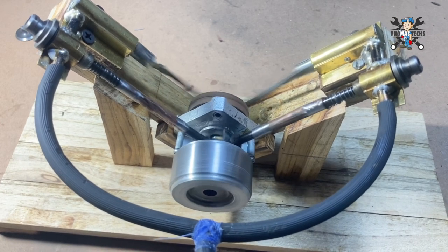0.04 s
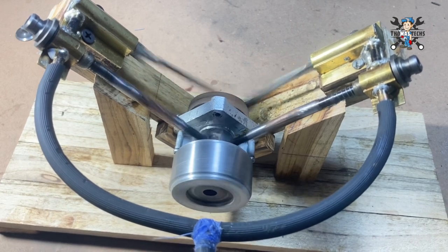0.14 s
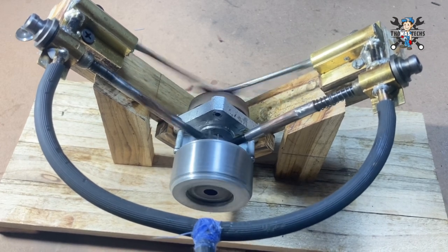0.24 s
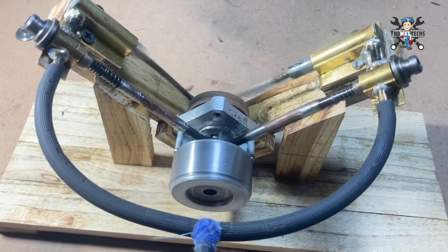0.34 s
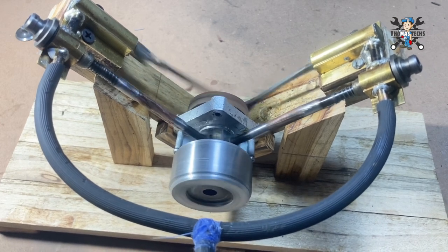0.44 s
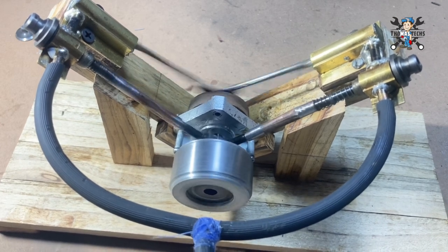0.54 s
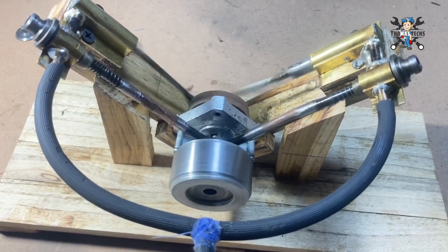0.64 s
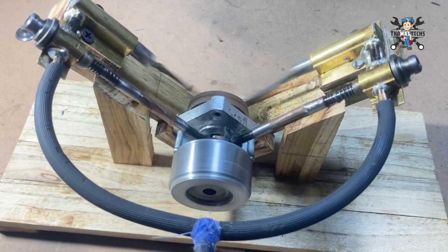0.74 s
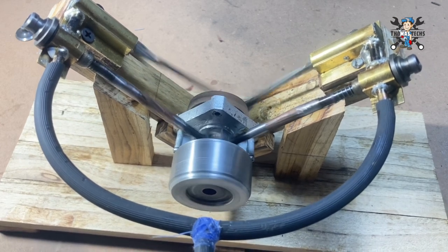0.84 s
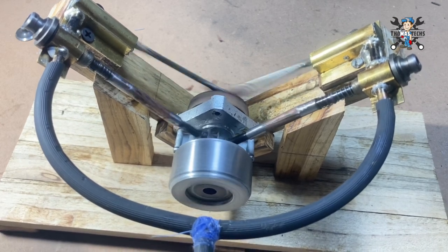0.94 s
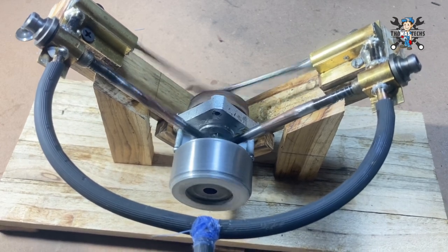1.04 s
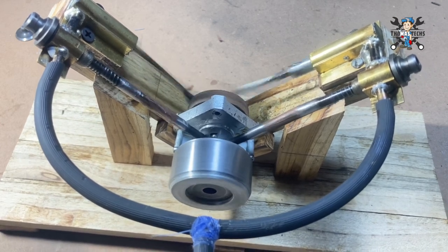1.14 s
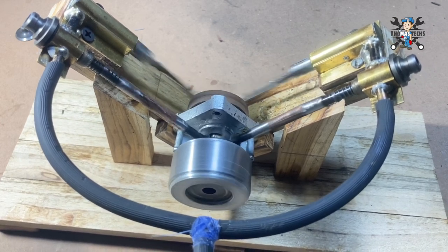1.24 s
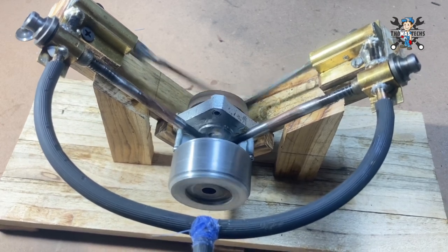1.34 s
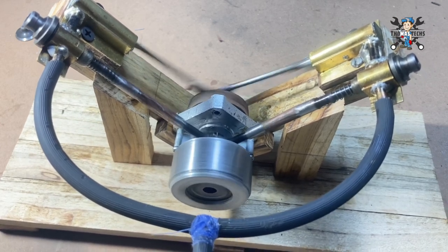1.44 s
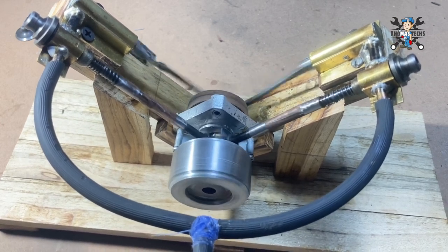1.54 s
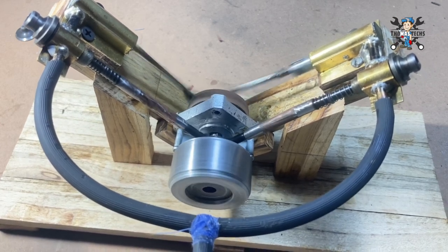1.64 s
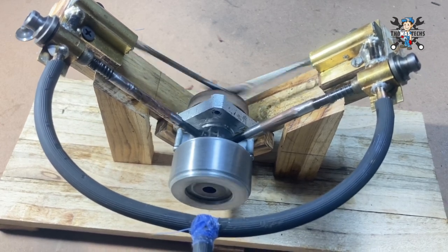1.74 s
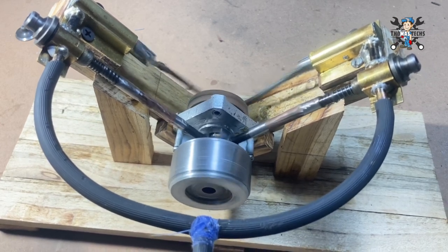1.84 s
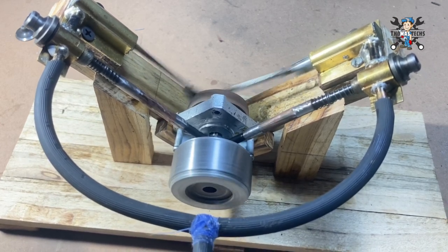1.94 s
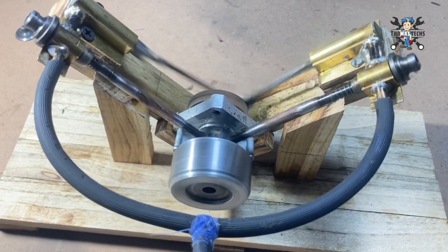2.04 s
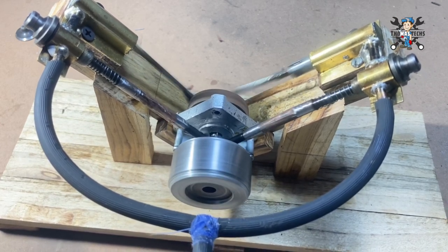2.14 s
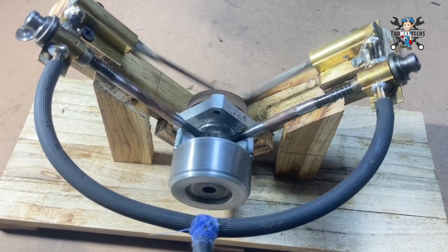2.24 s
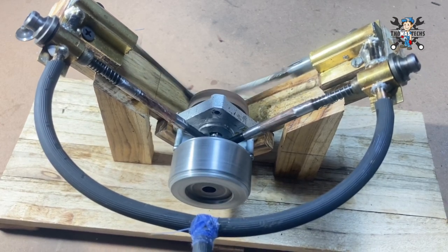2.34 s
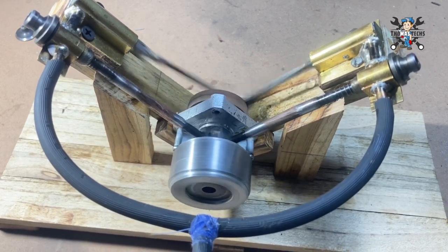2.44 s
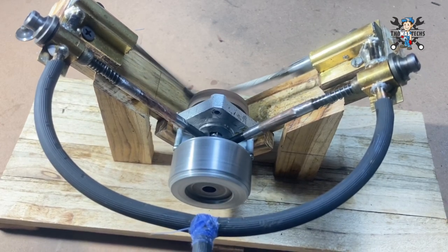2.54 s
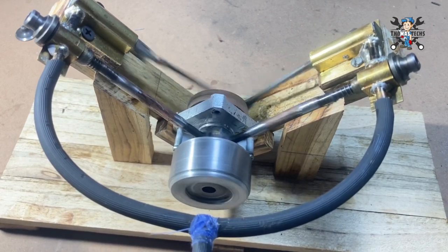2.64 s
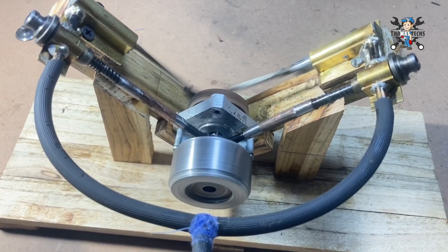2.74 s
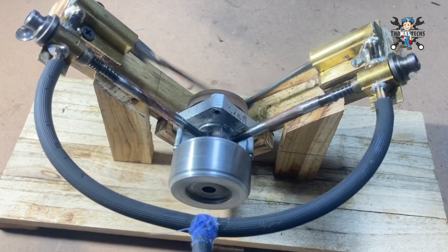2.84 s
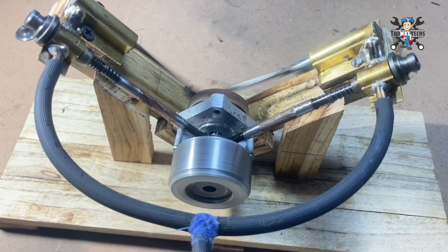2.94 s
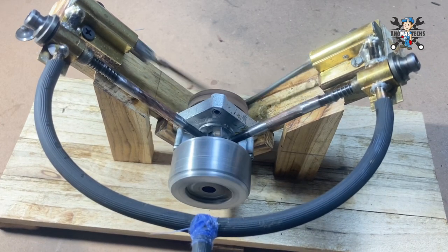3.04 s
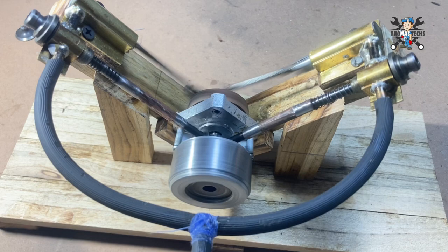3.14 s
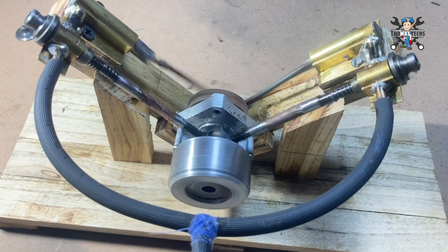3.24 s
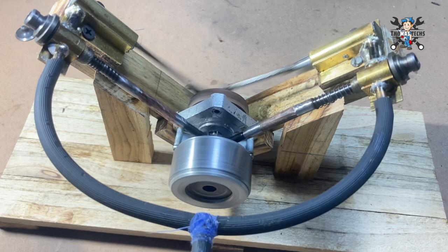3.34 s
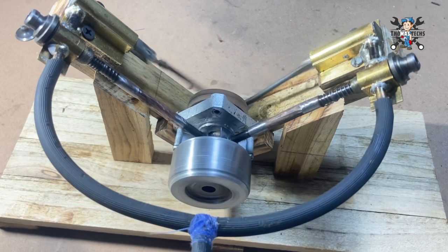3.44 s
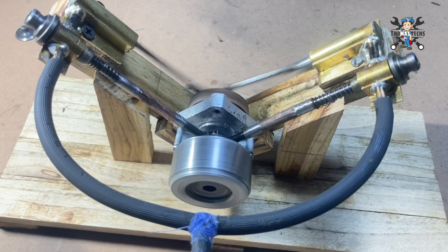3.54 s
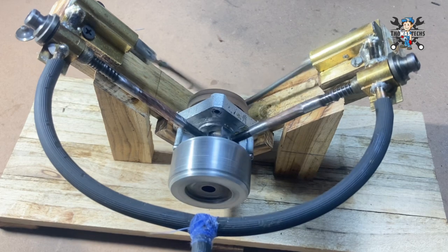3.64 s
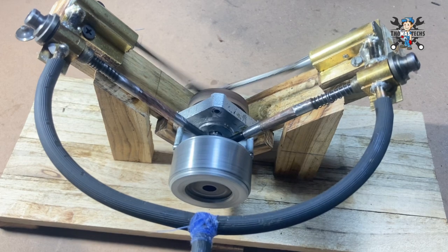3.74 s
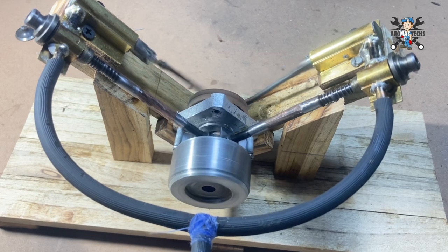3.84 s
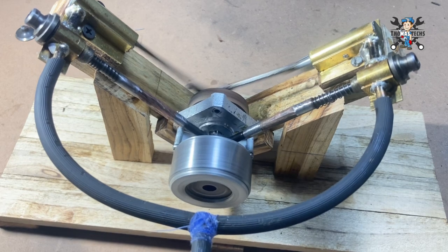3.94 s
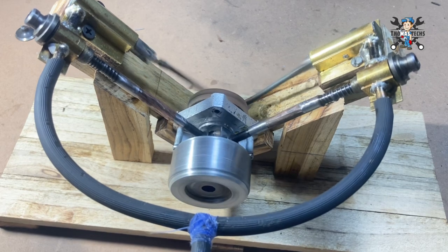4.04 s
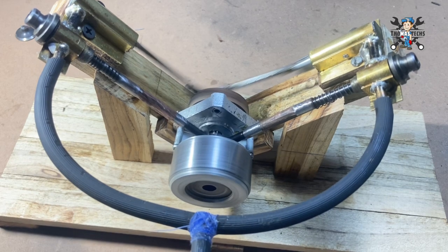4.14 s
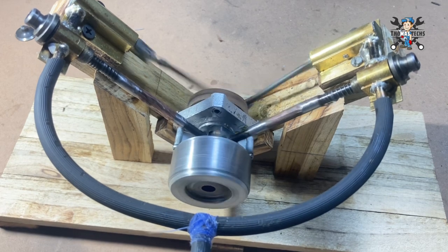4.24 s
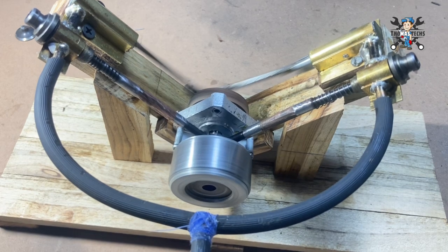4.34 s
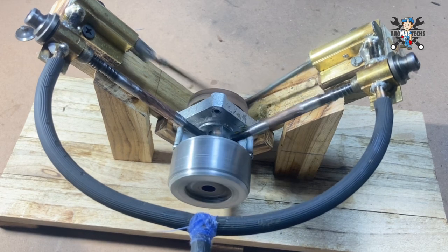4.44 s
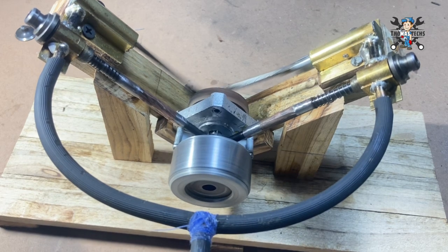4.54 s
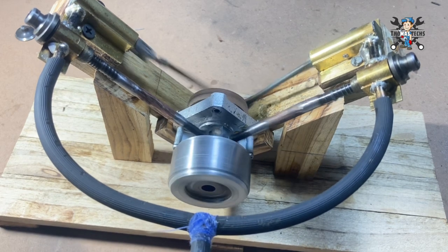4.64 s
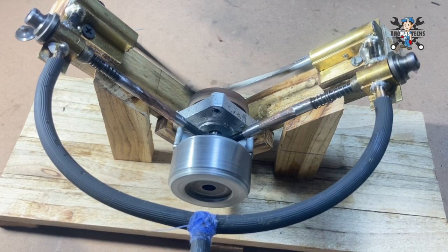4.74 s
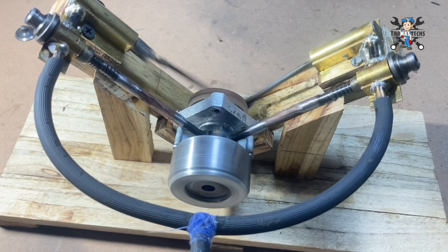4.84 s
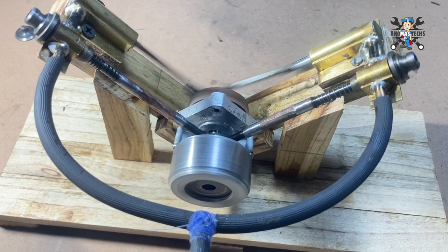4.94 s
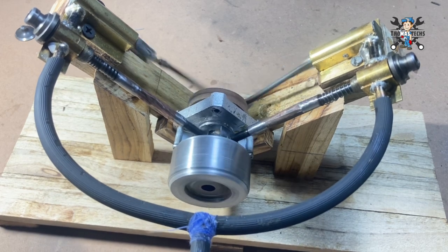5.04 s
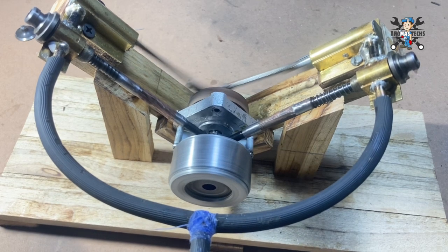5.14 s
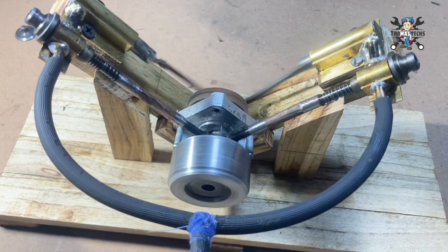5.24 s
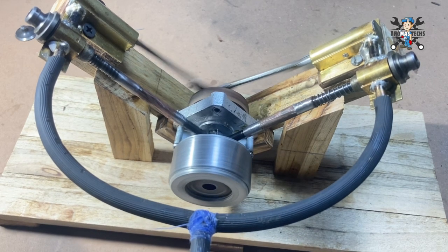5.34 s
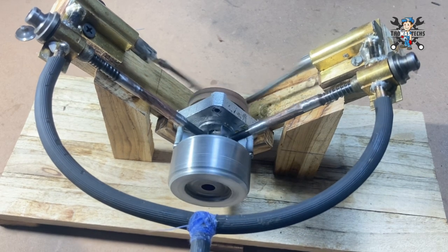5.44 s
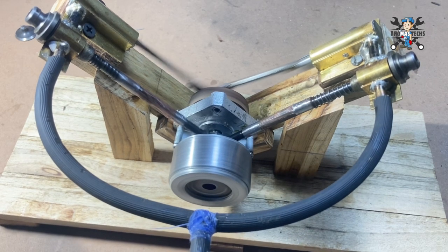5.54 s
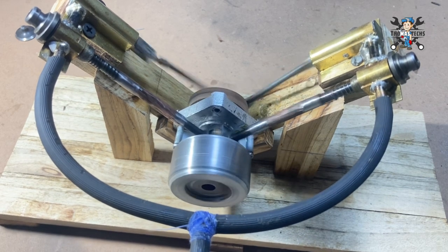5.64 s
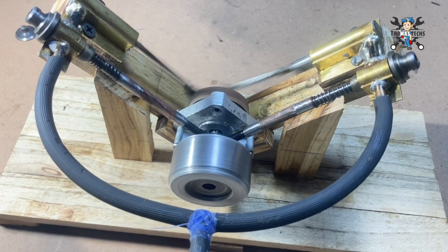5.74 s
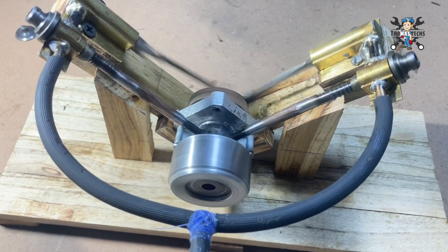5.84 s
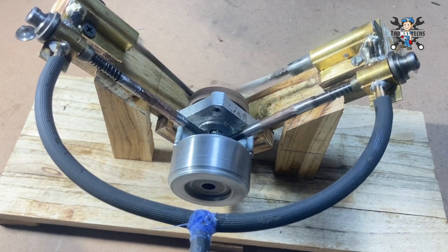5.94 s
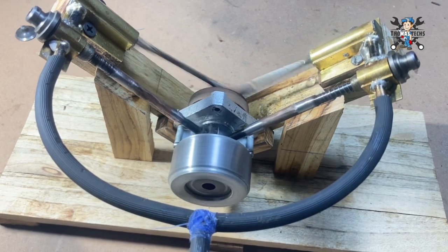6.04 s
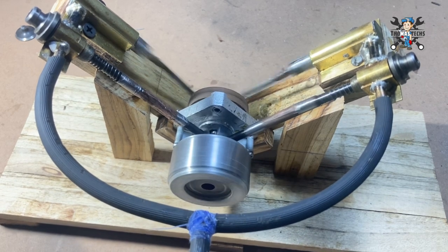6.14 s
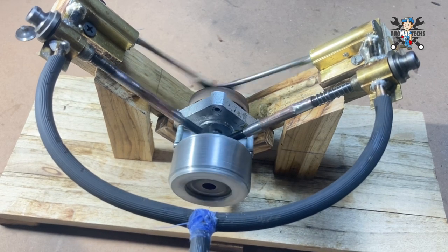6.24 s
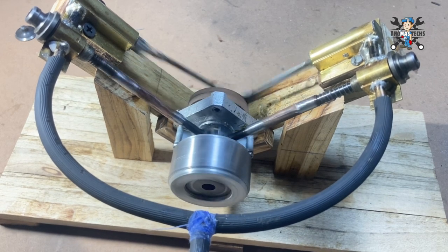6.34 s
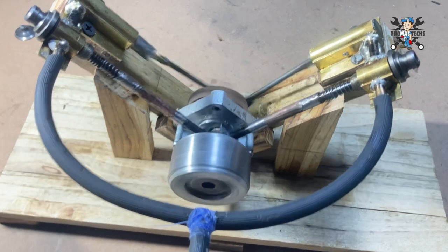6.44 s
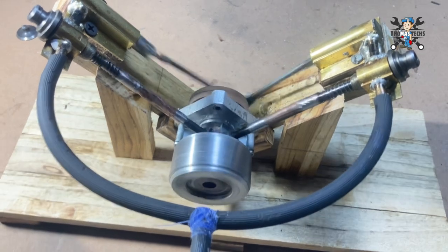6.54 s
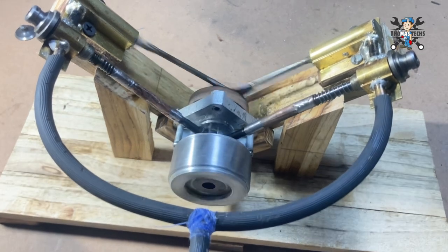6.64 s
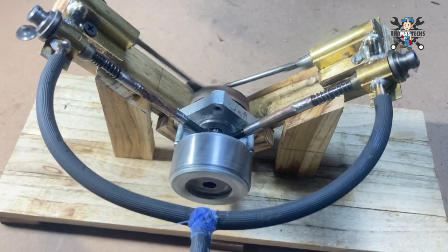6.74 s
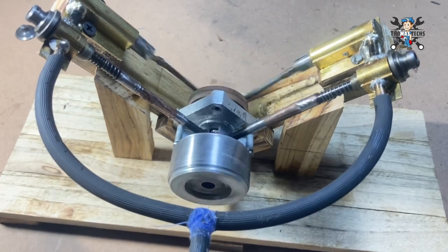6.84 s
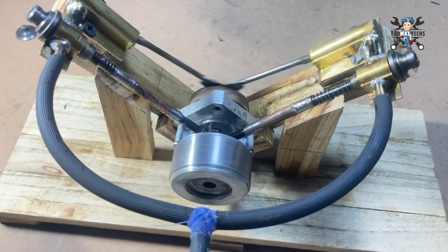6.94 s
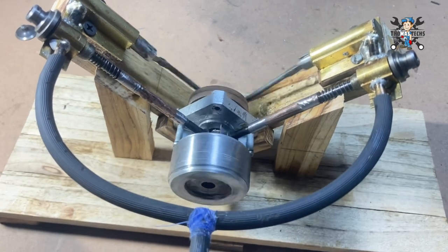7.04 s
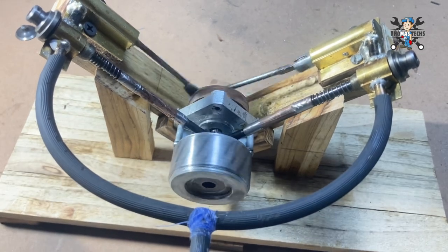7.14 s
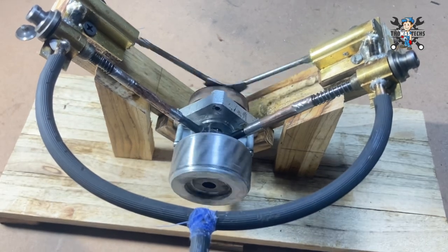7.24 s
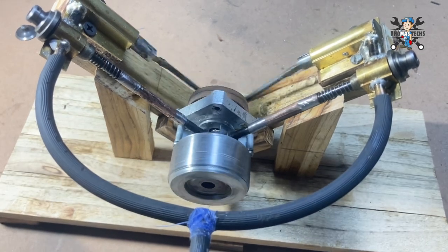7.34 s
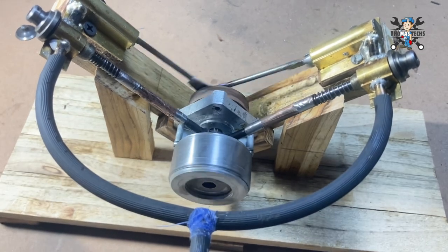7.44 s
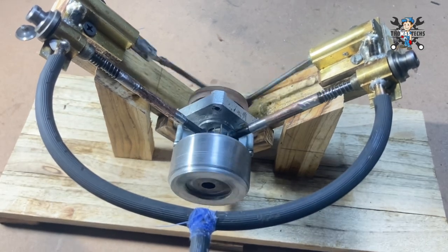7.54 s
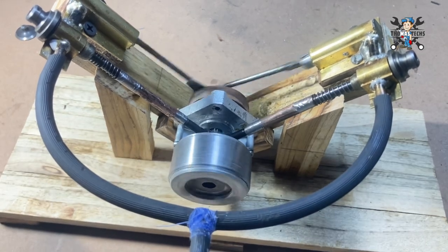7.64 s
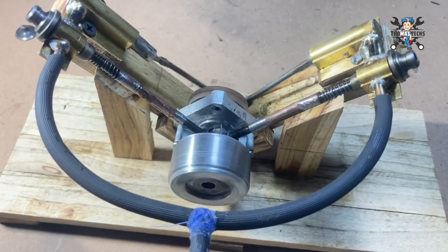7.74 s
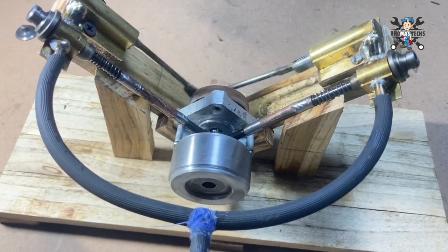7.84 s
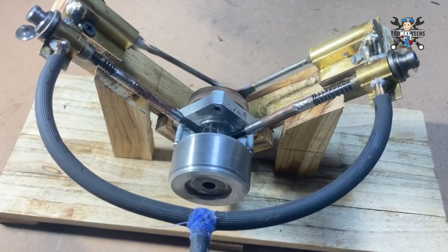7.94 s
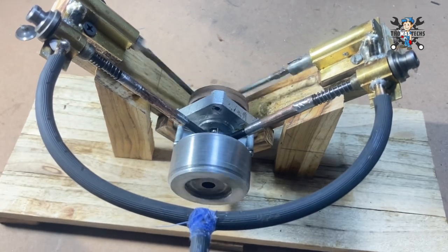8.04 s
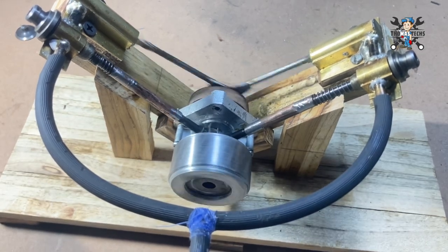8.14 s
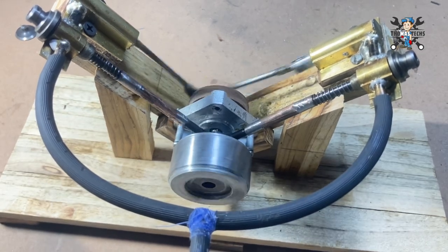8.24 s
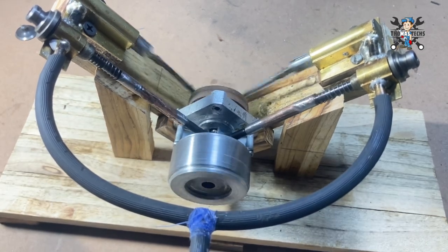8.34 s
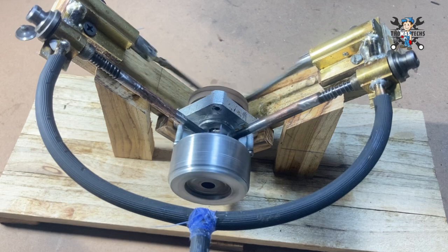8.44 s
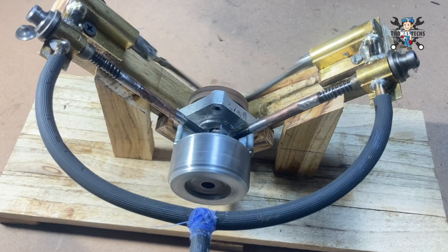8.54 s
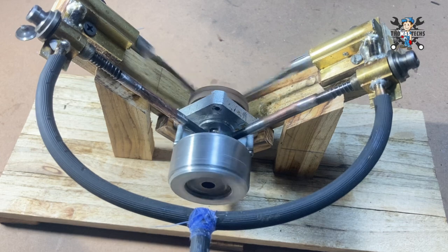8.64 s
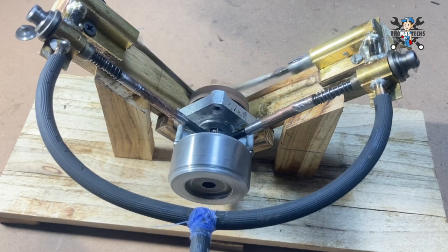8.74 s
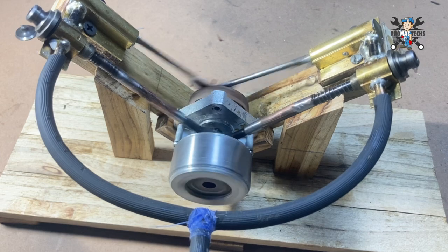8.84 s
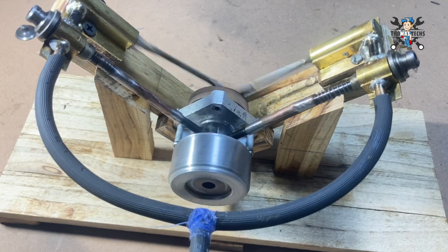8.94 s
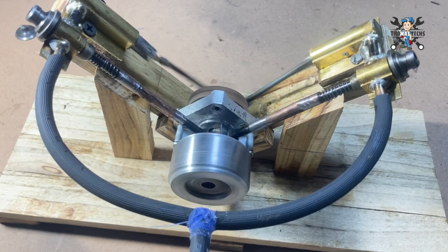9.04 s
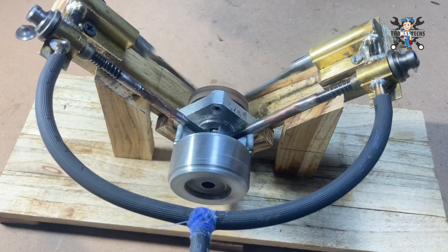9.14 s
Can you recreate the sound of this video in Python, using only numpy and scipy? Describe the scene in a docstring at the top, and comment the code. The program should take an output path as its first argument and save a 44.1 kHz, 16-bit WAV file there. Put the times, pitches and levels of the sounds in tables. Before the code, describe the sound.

A small two-cylinder engine runs on compressed air, heard close in stereo in a small room. From the start it races, spitting short, sharp puffs over a pulsing high hiss. Loose rods clink and rattle with woody knocks from the board beneath, along with faint piston scraping and a low shaking rumble. The strongest spits and knocks come around 1 to 1.5 seconds. The pace then dips briefly and settles into a steady, rapid clatter from about 2 to 6 seconds. Just after 6 seconds the engine slows and the hiss fades, until it almost stalls near 7.3 seconds. Until about 8 seconds it labours with separate, uneven chuffs, scattered knocks and a thin whistling hiss, clearest at 7.3 seconds. It then gathers speed with louder knocks and returning hiss, running quickly again from 8.6 seconds to the end at about 9 seconds.

```python
"""A small twin-cylinder engine on a wooden board runs fast on an air hose, slows almost to a halt
and picks up again. Its valves spit short puffs over a leak that breathes with the crank; at low speed
they chuff, with a thin whistle. Loose rods knock and rattle, ringing themselves and the board, the
pistons scrape and the unbalanced flywheel shakes the board. Close stereo from above, in a small room."""
import sys
import numpy as np
from scipy import signal
from scipy.io import wavfile
from scipy.ndimage import uniform_filter1d

SR = 44100
rng = np.random.default_rng(int(sys.argv[2]) if len(sys.argv) > 2 else 0)


def wrap_up_sound(samples):
    """Save the sound to the file named by the first command line argument, as 16-bit audio."""
    columns = np.atleast_2d(samples).T
    # keep every value between -1 and 1, then stretch to whole-number steps
    tamed = np.clip(columns, -1, 1)
    steps = np.round(tamed * 32767).astype(np.int16)
    wavfile.write(sys.argv[1], SR, steps)


N = 404824
T = np.arange(N) / SR

# faders of the continuous layers: (time [s], leak [dB], rattle [dB], shaking [dB])
FADERS = [(0.0, -28.5, -29.5, -37.5), (0.51, -28.5, -31.5, -41.5), (1.05, -28, -30, -36.5),
          (1.61, -32, -32.5, -42.5), (2.43, -30, -32, -40), (6.14, -30.5, -31.5, -40.5),
          (6.57, -42, -36, -44.5), (7.18, -53, -50.5, -47.5), (7.31, -24.5, -48.5, -43.5),
          (7.39, -43, -41, -43.5), (7.54, -33.5, -42, -42.5), (7.82, -51.5, -44.5, -45.5),
          (7.98, -28, -51, -43), (8.05, -42, -37.5, -46), (8.18, -26, -46, -43), (8.21, -37, -38.5, -44.5),
          (8.61, -28.5, -31, -40), (9.13, -33.5, -31.5, -39), (9.18, -34, -34.5, -47)]
# resonances of the board: (frequency [Hz], level [dB], t60 [s], left minus right [dB])
BOARD_MODES = [(284, -16.5, 0.037, 1), (476.6, -22.5, 0.051, 6.5), (722, -16.5, 0.022, -4),
               (1067.7, -0.5, 0.039, 5.5), (1183, -0.5, 0.03, 3), (1290.5, -3, 0.028, 9),
               (1412, -8, 0.035, -4.5), (1569.5, -4.5, 0.017, 7)]
# resonances of the rods: (frequency [Hz], level [dB], t60 [s], left minus right [dB])
ROD_MODES = [(1943, -18.5, 0.046, 1.4), (2426, -4.5, 0.018, 3.7), (2608, -8, 0.041, 4.3),
             (2737, 1.5, 0.019, 3.1), (2906, -7, 0.016, 6.7), (3350, -7, 0.015, 6.3),
             (3746, -8, 0.037, 4.6), (4110, -16, 0.028, 2), (4960, -16, 0.025, 1)]


def valve_air(opening):
    """Air bursts out as a valve opens, over a pulsing leak; slow turns under pressure give long chuffs."""
    # tone of the hiss, with a deep narrow gap near 12.9 kHz: (frequency [Hz], density [dB])
    hiss_spectrum = [(1500, -26.5), (3000, -16), (4300, -9.5), (5500, -8), (6600, -5), (8000, -1),
                     (9200, -2.5), (10300, -4), (11200, -6.5), (12200, -9.5), (12900, -72), (13800, -12.5),
                     (14800, -21.5), (15600, -10)]
    # stereo focus of the jet: (frequency [Hz], left-right likeness [0-1])
    jet_likeness = [(3000, 0.044), (5500, 0.11), (6500, 1), (15000, 1)]
    in_step_hz, cycle_hz = 6784, 4580  # the jet reaches the right side first: a cycle more per cycle_hz
    jet = stereo_noise(hiss_spectrum, jet_likeness, lambda hz: 2 * np.pi * (hz - in_step_hz) / cycle_hz,
                       patchy_db=3.0, size=256)
    slow = np.clip((13.0 - crank_speed()) / 12.6, 0, 1)
    held = slow * np.clip(opening / 0.29, 0, 1)  # weak openings stay short
    t = np.arange(3000) / SR
    spit = (1 - np.exp(-t / 0.0012)) * (np.exp(-t / 0.0011) + 0.18 * np.exp(-t / 0.0069))
    chuff = (1 - np.exp(-t / 0.0021)) ** 2 * (2.0 * np.exp(-t / 0.0059) + 0.36 * np.exp(-t / 0.012))
    puffs = signal.oaconvolve(opening * (1 - held), spit)[:N]
    puffs += signal.oaconvolve(opening * held, chuff)[:N]
    puffs += 33.0 * uniform_filter1d(uniform_filter1d(opening, 121), 121)  # air creeps past just before
    turbulence = unit_rms(uniform_filter1d(rng.standard_normal(N), size=90))
    leak = gain_of(curve(FADERS, 1) + (1 + 0.43 * slow) * turn_db(1) - 1.5)  # pulses deeper when slow
    return jet * np.hypot(gain_of(-3.5) * puffs, leak) * gain_of(2.1 * np.clip(turbulence, -2, 2))


def valve_openings():
    """One spike for each valve opening: the rhythm of the crank plus single accents."""
    # puffs of every turn: (moment, pressure share, spread [dB], crawling [dB], cruising [dB], racing [dB])
    puffs = [("second valve", 1, 0.61, -6.5, -10.5, -11.5), ("first valve", 0.41, 1.9, -11, -19.5, -38),
             ("lead", 1, 3.2, -45, -36, -11), ("between", 1, 3, -15.5, -40, -25),
             ("after", .95, 2.5, -12, -32, -21), ("late", .9, 4.1, -44, -22.5, -36)]
    # loudest puffs at full speed: (time [s], level [dB])
    accents = [(0.2314, -10), (0.2897, -18), (0.764, -12), (0.8764, -10), (1.0064, -4), (1.1159, -11),
               (1.1488, -7), (1.3733, -12), (1.3997, -19), (1.4343, -5.5), (1.498, -8), (1.6821, -10),
               (1.9736, -15), (2.1802, -8.5), (2.3785, -19), (3.04, -24), (3.4363, -14), (4.0183, -12),
               (5.236, -16), (6.053, -16)]
    return crank_spikes(puffs) + spikes(accents)


def valve_pings(opening):
    """The spool and its spring ring briefly as a valve snaps open; a ragged snap colours each ping."""
    # resonances of the spool: (frequency [Hz], level [dB], t60 [s], left minus right [dB])
    spool_modes = [(5076, -9.5, 0.029, -1), (5215, -6.5, 0.045, 6), (6860, 10, 0.0078, -4.5),
                   (11060, 7, 0.013, 2)]
    snap = signal.oaconvolve(opening, np.exp(-np.arange(150) / 34.0))[:N] * rng.standard_normal(N)
    return gain_of(-23.5) * ring(snap, spool_modes, lag_rad=0.22)


def rod_knocks():
    """Rod ends hit across their slack and ring board and rods; each loud knock is a scuffle of contacts."""
    # loudest knocks: (time [s], level [dB])
    accents = [(0.4219, -13), (0.7188, -12), (0.7657, -17), (0.822, -22), (0.9323, -21), (0.9522, -10),
               (0.9867, -11.5), (1.062, -10.5), (1.1169, -9), (1.2281, -14.5), (1.262, -13), (1.4012, -16),
               (1.499, -17), (1.8357, -17.5), (2.3166, -28), (2.7117, -14.5), (5.0843, -20),
               (7.0544, -24.5), (7.3048, -24), (7.4709, -26), (7.5323, -22), (7.6725, -17.5),
               (7.9029, -20.5), (7.9723, -23), (8.1234, -17), (8.1733, -16), (8.2786, -14), (8.315, -18),
               (8.4008, -13), (8.4302, -13.5), (8.5061, -10.5), (8.5999, -13.5), (8.7934, -13.5),
               (8.8528, -11), (8.8757, -15), (8.9351, -10)]
    # board hits per turn: (moment, pressure share, spread [dB], crawling [dB], cruising [dB], racing [dB])
    clacks = [("first knock", 0.18, 2.9, -25.5, -20.5, -23),
              ("second knock", 0.57, 3.4, -24.5, -19.5, -21.5), ("reversal", 0.46, 4.5, -34, -22.5, -21.5),
              ("second valve", 1, 9, -33, -30.5, -21), ("half", 0.26, 1.6, -23.5, -31.5, -32),
              ("return", .4, 3.1, -38, -25.5, -23)]
    # rod hits per turn: columns as in clacks
    clinks = [("reversal", 0.21, 3.3, -23, -20.5, -15.5), ("take-up", .4, 5.4, -40, -24, -27),
              ("second valve", 0.89, 8.4, -33, -34.5, -25.5), ("return", 0.28, 5.7, -32, -29, -29)]
    # loudest clinks: (time [s], level [dB])
    loud_clinks = [(0.177, -16), (0.2399, -15), (0.2997, -16), (0.3601, -16), (0.4209, -12), (1.3219, -18),
                   (1.3818, -21), (2.4404, -25), (5.2784, -16), (5.8227, -19), (6.099, -20), (6.1679, -20),
                   (6.2412, -15), (6.3195, -17), (6.4068, -28), (6.4687, -24), (6.6513, -36), (6.9217, -33)]
    blows = spikes(accents)
    scuffles = np.exp(-np.arange(200) / 23.0) * rng.standard_normal((len(accents), 200))
    tails = np.zeros(N + 200)
    for at, scuffle in zip(np.flatnonzero(blows), scuffles):
        tails[at:at + 200] += 0.056 * blows[at] * scuffle
    blows = gain_of(-0.5) * (blows + tails[:N])
    bright = gain_of(-8.0 + 2.0 * np.cos(2 * np.pi * (crank_angle() - .05)))  # most at the first valve
    board = ring(blows + crank_spikes(clacks), BOARD_MODES, lag_rad=0.79)
    rods = ring(blows * bright + crank_spikes(clinks) + spikes(loud_clinks), ROD_MODES, lag_rad=1.64)
    return board + rods


def joint_rattle(modes, turn_column, per_s, db, lead_samples, lag_rad):
    """Small irregular taps of loose joints at either cylinder, harder where the load changes over."""
    taps = gain_of(2.7 * np.minimum(rng.exponential(1, N), 3)) * rng.choice([-1, 1], N)
    taps *= (rng.random(N) < per_s / SR) * gain_of(turn_db(turn_column))
    other = rng.random(N) < .4  # taps of the other cylinder reach the right side sooner
    right = taps * ~other + np.roll(taps * other, -lead_samples)
    return unit_rms(ring([taps, right], modes, lag_rad)) * gain_of(curve(FADERS, 2) + db)


def flywheel_shake():
    """Wavering harmonics of the shaft over a low rumble; both sound through the board on its table."""
    # shaft harmonics: (multiple of crank speed, level [dB])
    orders = [(3, -1), (4, 1), (5, 0.5), (6, 2.5), (7, -5.5), (8, -11.5), (9, 2.5), (10, 0.5), (11, 0),
              (13, -2), (15, -1), (18, 0)]
    # tone of the shaking board: (frequency [Hz], density [dB])
    body = [(18, -47), (30, -36), (46, -7), (75, 0.5), (243, -11), (280, -8.5), (488, -16), (532, -15),
            (900, -20.5), (1170, -38), (1980, -120)]
    times = np.arange(0, N + 400, 400) / SR
    wavers = unit_rms(uniform_filter1d(rng.standard_normal((len(orders), len(times))), size=25, axis=1))
    speed, angle, hum = np.interp(times, T, crank_speed()), crank_angle(), np.zeros(N)
    for (multiple, db), waver in zip(orders, wavers):
        level = gain_of(db + 2.8 * waver + at_hz(body, multiple * speed))
        hum += np.interp(T, times, level) * np.sin(2 * np.pi * (multiple * angle + rng.random()))
    rumble = stereo_noise(body, likeness=[(100, 0.96), (300, 1.0), (700, 0.75)],
                          lead_rad=np.zeros_like, patchy_db=3.0, size=2048)
    return (unit_rms(hum) + rumble) * gain_of(curve(FADERS, 3) - 2.0 + np.array([[-.7], [.7]]))


def piston_scrape():
    """Pistons and rods scrape in their guides: a wide hiss that pulses with the crank."""
    level_db = curve(FADERS, 2) + 1.134 * turn_db(3) - 12.5
    return noise_band([2200, 5500], N) * gain_of(level_db + np.array([[1.5], [-1.5]]))


def whistle():
    """A thin whistling hiss while the engine labours at low speed."""
    # whistle envelope: (time [s], level [dB])
    envelope = [(7.16, -70), (7.2, -40), (7.29, -45), (7.31, -25), (7.36, -63), (7.42, -46), (7.8, -61),
                (8.0, -43), (8.5, -48), (8.8, -60)]
    start = int(envelope[0][0] * SR)
    hiss = noise_band([4600, 5400], N - start) * gain_of(curve(envelope, 1)[start:])
    return np.pad(hiss, ((0, 0), (start, 0)))


def room(x, t60_s=0.24):
    """Sparse reflections of a small room die away, a separate set on each side."""
    delay = np.arange(8000)
    echoes = rng.choice([-1., 1.], (2, 8000)) * (rng.random((2, 8000)) < .05)
    echoes *= gain_of(-60 * delay / SR / t60_s) * (delay > 100)
    return signal.oaconvolve(x, echoes / np.linalg.norm(echoes[0]), axes=1)[:, :N]


def crank_speed():
    """The tempo of the engine in turns a second."""
    # fast run, near stall, recovery: (time [s], speed [turns/s])
    tempo = [(0.0, 18.709), (0.33, 16.369), (0.93, 18.295), (1.39, 17.688), (1.47, 14.097), (1.7, 13.1),
             (1.9, 13.941), (2.25, 15.218), (4.43, 14.884), (5.22, 15.293), (5.5, 14.684), (5.94, 14.38),
             (6.14, 14.608), (6.36, 11.593), (6.42, 8.767), (6.8, 6.901), (6.86, 8.39), (7.05, 6.991),
             (7.19, 5.774), (7.28, 2.935), (7.4, 3.853), (7.46, 5.619), (7.62, 4.387), (7.7, 6.238),
             (7.76, 3.045), (7.94, 4.971), (8.06, 3.734), (8.1, 5.559), (8.61, 11.34), (8.78, 12.338),
             (9.19, 11.595)]
    return curve(tempo, 1)


def crank_angle(start_turns=-1.287):
    """Crank angle in turns."""
    return start_turns + np.cumsum(crank_speed()) / SR


def turn_db(column):
    """A swell that repeats with every turn of the crank."""
    # one turn: (angle [turns], leak [dB], board rattle [dB], rod rattle [dB])
    swells = [(0, 1.5, 4.5, 7), (.1, 5.5, 7, 4), (.2, 5, 2, 9), (.3, 4, 5, 3), (.4, 3.5, 5, 12.5),
              (.5, 0, 0, -3.5), (.6, 7, 1, 2.5), (.7, 0, 0.5, 4.5), (.8, -2, -6, 2.5), (.9, 3.5, 4.5, 10)]
    rows = np.array(swells)
    return np.interp(crank_angle(), rows[:, 0], rows[:, column], period=1)


def crank_spikes(pattern, slack_s=.0008):
    """A slightly uneven spike as the crank passes each moment; speed and pressure set its strength."""
    # supply pressure: (time [s], level [dB])
    pressure = [(0, -2), (1.0, 2), (1.5, 0), (1.6, -4), (1.9, 1), (6.15, 0), (6.22, -8), (7.1, -33),
                (7.2, -6.5), (7.56, -3), (7.7, -6.5), (7.86, -27), (7.92, -2), (8.7, 5.5), (8.8, 1),
                (9.05, 1.5), (9.18, -9)]
    # moments of every turn: name -> (angle [turns], lag [s])
    moments = {"first valve": (-.03, .009), "second valve": (.35, 0), "lead": (-.115, 0),
               "between": (.2, 0), "after": (.49, 0), "late": (.595, 0), "first knock": (-.03, .0115),
               "second knock": (.35, .004), "reversal": (.015, 0), "take-up": (.12, 0), "return": (-.16, 0),
               "half": (.63, 0)}
    # crank speeds: (crawling [turns/s], cruising [turns/s], racing [turns/s])
    paces = [9, 15, 17]
    out, turns = np.zeros(N), np.arange(-1, 120)
    angle, speed, pressure_db = crank_angle(), crank_speed(), curve(pressure, 1)
    for moment, share, spread_db, *levels_db in pattern:
        turn, lag_s = moments[moment]
        slack, force = np.clip(rng.standard_normal((len(turns), 2)).T, -1.5, 1.5)
        times = np.interp(turns + turn, angle, T, left=-1, right=-1) + lag_s + slack_s * slack
        db = np.interp(np.interp(times, T, speed), paces, levels_db)
        db += share * np.interp(times, T, pressure_db) + spread_db * force
        out += spikes(np.transpose([times, db])[(times > 0) & (times < T[-1])])
    return out


def ring(blows, modes, lag_rad):
    """Blows ring a set of decaying modes, each lagging in phase on the right."""
    t, response = np.arange(2500) / SR, np.zeros((2, 2500))
    for k, (hz, db, t60, pan_db) in enumerate(modes):
        level = gain_of(db - 60 * t / t60 + pan_db / 2 * np.array([[1], [-1]]))
        response += (-1) ** k * level * np.sin(2 * np.pi * hz * t - np.array([[0], [lag_rad]]))
    response *= (1 - np.exp(-t / 0.00062)) ** 2  # contact takes a moment
    return signal.oaconvolve(np.atleast_2d(blows), response / abs(response).max(), axes=1)[:, :N]


def stereo_noise(spectrum, likeness, lead_rad, patchy_db, size):
    """Coloured noise with drifting patches; likeness and phase lead tie right to left."""
    frames, hz = 4 * N // size + 5, np.fft.rfftfreq(size, 1 / SR)
    a, b, c, d, patches = rng.standard_normal((frames, len(hz), 5)).T
    left, unrelated = a + 1j * b, c + 1j * d
    patches = unit_rms(uniform_filter1d(uniform_filter1d(patches, size=3, axis=0), size=9, axis=1))
    same = np.clip(at_hz(likeness, hz), 0, 1)[:, None]
    right = same * left * np.exp(1j * lead_rad(hz))[:, None] + np.sqrt(1 - same ** 2) * unrelated
    bins = np.array([left, right]) * gain_of(at_hz(spectrum, hz)[:, None] + patchy_db * patches)
    return unit_rms(signal.istft(bins, nperseg=size, noverlap=size * 3 // 4)[1][:, :N])


def noise_band(edges_hz, samples):
    """Band-passed noise, unrelated left and right."""
    band = signal.butter(2, edges_hz, "bandpass", fs=SR, output="sos")
    return unit_rms(signal.sosfilt(band, rng.standard_normal((2, samples))))


def spikes(table):
    """One spike for each (time [s], level [dB]) row."""
    times, db = np.transpose(table)
    out = np.zeros(N)
    np.add.at(out, np.clip((times * SR).astype(int), 0, N - 1), gain_of(db))
    return out


def at_hz(points, hz):
    """A spectrum read on a log-frequency axis."""
    point_hz, value = np.transpose(points)
    return np.interp(np.log(hz + 1), np.log(point_hz + 1), value)


def curve(table, column):
    rows = np.array(table)
    return np.interp(T, rows[:, 0], rows[:, column])


def gain_of(db):
    return 10 ** (np.asarray(db) / 20)


def unit_rms(x):
    return x / np.sqrt(np.mean(x ** 2) + 1e-20)


def scene():
    """Air, linkage, scrape and shake; only the linkage is sent to the room."""
    rattle = joint_rattle(BOARD_MODES, turn_column=2, per_s=700, db=-2.0, lead_samples=2, lag_rad=0.42)
    rattle += joint_rattle(ROD_MODES, turn_column=3, per_s=700, db=-5.5, lead_samples=9, lag_rad=1.04)
    opening = valve_openings()
    linkage = rod_knocks() + rattle
    air = valve_air(opening) + valve_pings(opening) + whistle()
    return air + linkage + piston_scrape() + flywheel_shake() + room(gain_of(-9.5) * linkage)


def record(dry, ceiling=0.85, low_cut_hz=44, high_cut_hz=15850):
    """The microphone drops the deepest bass and rounds off the peaks; a steep filter trims the top."""
    low_cut = signal.sosfilt(signal.butter(4, low_cut_hz, "highpass", fs=SR, output="sos"), dry)
    rounded = ceiling * np.tanh(low_cut / ceiling)
    high_cut = signal.firwin(511, high_cut_hz, window=("kaiser", 9), fs=SR)
    return signal.oaconvolve(rounded, high_cut[None], "same")


dry = scene()
out = record(dry)
wrap_up_sound(out)
```